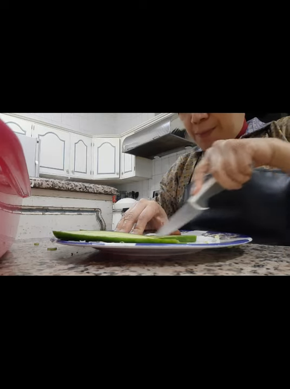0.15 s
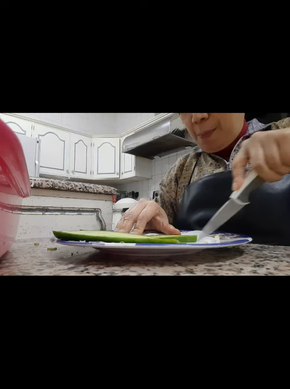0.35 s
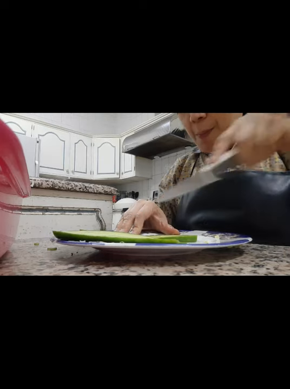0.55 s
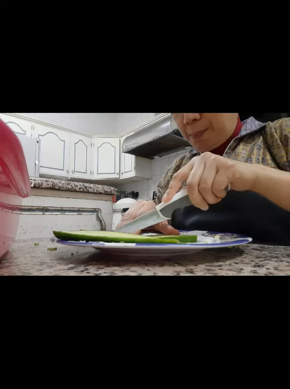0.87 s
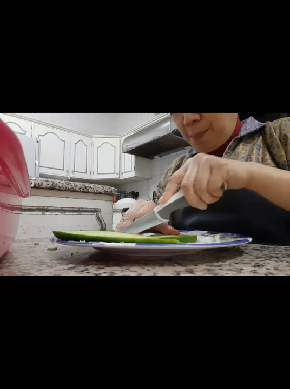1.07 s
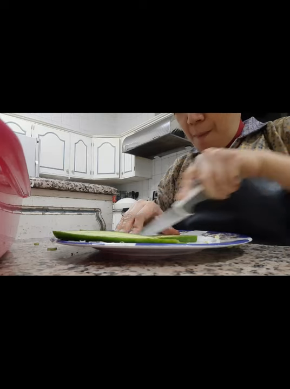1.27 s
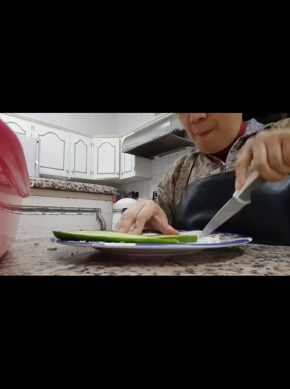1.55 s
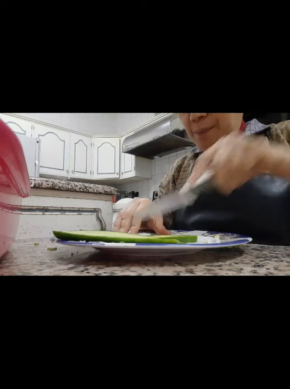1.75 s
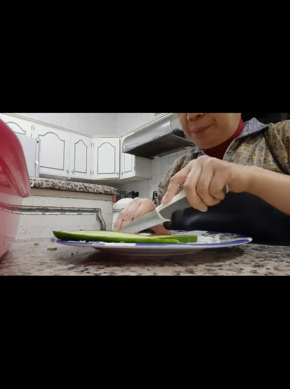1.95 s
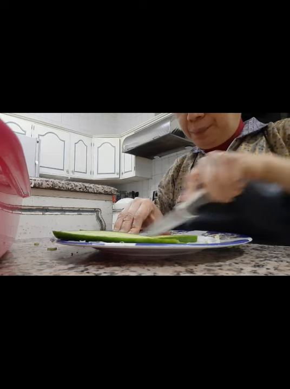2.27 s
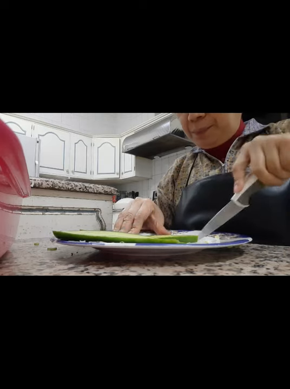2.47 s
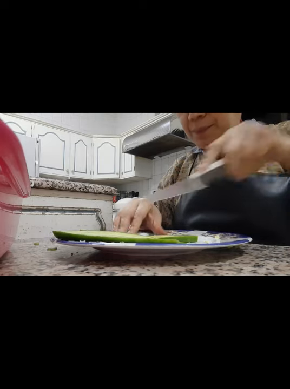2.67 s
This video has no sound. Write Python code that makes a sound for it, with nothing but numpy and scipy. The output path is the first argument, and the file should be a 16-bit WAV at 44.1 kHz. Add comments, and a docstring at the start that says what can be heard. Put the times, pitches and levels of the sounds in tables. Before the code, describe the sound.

Close up, three cucumber slices: rasping crunch, hollow knocks, bright blade click on the plate, then a pause. Light taps set the blade down before the second and third cuts; steady hum in a reverberant kitchen.

```python
"""Knife slicing cucumber.

A knife makes three strokes through a cucumber on a plate, close to a phone in a small tiled kitchen.
Fracture grains make the cut (low crunch, rasp, wet hiss) and a faint bright tick and hiss bursts.
Damped modes plus noise cracks make the skin snaps, plate clicks and the taps before strokes two and three.
Noise-driven hum lines, a sine whine and coloured air noise make the appliance behind.
"""
import sys
import numpy as np
from scipy import signal
from scipy.fft import rfft, irfft
from scipy.io import wavfile

SR = 44100
rng = np.random.default_rng(int(sys.argv[2]) if len(sys.argv) > 2 else 0)


def digitize_waveform(pressure):
    """Quantize a signal to 16-bit integers and store it at the path in sys.argv[1].

    Rows of a 2-D input are taken as channels; values are limited to [-1, 1].
    """
    field = np.atleast_2d(pressure).T
    bounded = np.clip(field, -1, 1)
    quanta = np.round(bounded * 32767).astype(np.int16)
    wavfile.write(sys.argv[1], SR, quanta)


N = 123479


def amp(db):
    """Decibels to gain."""
    return 10 ** (np.asarray(db) / 20)


def unit(x):
    """Scale to rms 1."""
    return x / np.sqrt(np.mean(x ** 2))


def pan(left_minus_right_db):
    """Gains of the left and right ports."""
    return amp(np.array([[left_minus_right_db], [-left_minus_right_db]]) / 2)


def spread(three, apart):
    """Stereo pair from one shared and two separate signals; apart: 0 shared, 1 separate."""
    apart = np.clip(apart, 0, 1)
    return np.sqrt(1 - apart) * three[0] + np.sqrt(apart) * three[1:]


def add(out, start_s, sound):
    """Mix a sound in at a time."""
    i = max(int(start_s * SR), 0)
    out[:, i:i + sound.shape[1]] += sound[:, :N - i]


def colour(x, points):
    """Minimum-phase filter of unit energy through (f/Hz, level/dB), falling 30 dB/octave beyond the ends."""
    hz, db = np.array(points, float).T
    octave = np.log2(np.maximum(np.arange(4097) * SR / 8192, 1))
    below = np.maximum(np.log2(hz[0]) - octave, 0)
    above = np.maximum(octave - np.log2(hz[-1]), 0)
    response_db = np.interp(octave, np.log2(hz), db) - 30 * (below + above)
    # folding the cepstrum makes the response causal
    cepstrum = irfft(np.log(amp(np.maximum(response_db, -100))))
    cepstrum[1:4096] *= 2
    cepstrum[4097:] = 0
    impulse = irfft(np.exp(rfft(cepstrum)))
    impulse = impulse[None] / np.linalg.norm(impulse)
    return signal.fftconvolve(x, impulse, axes=1)[:, :x.shape[1]]


def decay(t, t60_s):
    """Exponential fall of 60 dB in t60."""
    return np.exp(-np.log(1000) * t / t60_s)


PORT_LAG_S, RING_RISE_S = 0.00004, 0.00045


def ring(hz, db, t60_s, rise_s=RING_RISE_S, delay_s=0):
    """One damped mode, reaching the right port slightly later."""
    t = np.maximum(np.arange(SR // 3) / SR - delay_s - np.array([[0], [PORT_LAG_S]]), 0)
    return amp(db) * np.sin(2 * np.pi * hz * t) * decay(t, t60_s) * (1 - np.exp(-t / rise_s))


CRACK_RISE_S = 0.0006


def crack(points, t60_s, apart):
    """Short contact noise that builds as the edge bites, then dies away."""
    t = np.arange(SR // 8) / SR
    env = decay(t, t60_s) * (1 - np.exp(-(t / CRACK_RISE_S) ** 2))
    return colour(spread(rng.standard_normal((3, len(t))), apart) * env, points)


def grains(rate_per_s, scatter_db, apart):
    """Stereo stream of tiny grains: random impulses of either sign and scattered size; rms 1."""
    size = amp(scatter_db * np.clip(rng.standard_normal((3, N)), -2, 2))
    sign = rng.choice([-1, 1], (3, N))
    struck = rng.random((3, N)) < rate_per_s / SR
    return unit(spread(size * sign * struck, apart))


# hum lines before pan: f/Hz, level/dB, full width at half amplitude/Hz
HUM_LINES = [(105, -63.5, 6), (211.2, -49.5, 3.7), (292.4, -44, 6.5), (314.6, -45, 9.9), (462, -56, 4)]
# air rush colour: f/Hz, relative level/dB
AIR_COLOUR = [(36, -37), (52, -21), (78, -32), (100, -21), (150, -20.5), (185, -12), (260, -11), (330, -8),
              (400, -13), (520, -15.5), (700, -18), (1000, -25.5), (1500, -35.5), (2300, -38), (2800, -39),
              (3400, -51), (4500, -55.5), (8000, -53), (10000, -58), (16000, -62.5)]
AIR_DB = -41.5
HUM_STEADINESS = 0.38  # 0 fades freely, 1 holds its level
WHINE_HZ, WHINE_PEAK_DB = 2730, -69.5


def appliance():
    """Wavering narrowband hum and a steady sine whine over an air rush whose bass is alike at both ports."""
    f = np.arange(N // 2 + 1) * SR / N
    hum = amp(WHINE_PEAK_DB) * np.sin(2 * np.pi * WHINE_HZ * np.arange(N) / SR)
    for hz, db, width_hz in HUM_LINES:
        band = 1 + ((f - hz) / (width_hz / 2)) ** 4
        line = irfft(rfft(rng.standard_normal((3, N))) / band, N)
        envelope = np.abs(signal.hilbert(line)) + 1e-12
        line = line / envelope ** HUM_STEADINESS
        hum = hum + amp(db) * unit(spread(line, apart=0.065))
    air_apart = 0.063 + 1.24 / (1 + (650 / (f + 1)) ** 4)
    air = irfft(spread(rfft(rng.standard_normal((3, N))), air_apart), N)
    return (hum + amp(AIR_DB) * colour(air, AIR_COLOUR)) * pan(1.5)


# reverberation bands: f/Hz, t60/s, level/dB
ROOM_BANDS = [(300, 0.13, -0.5), (710, 1, -8.5), (1545, 0.67, -9.5), (2280, 0.67, -5), (4180, 0.53, -8.5),
              (6600, 0.6, -14.5), (8500, 0.51, -9.5), (12500, 0.36, -11.5), (15700, 0.35, -12)]
ROOM_BUILD_S = 0.0097
EARLY_T60_S, EARLY_DB = 0.017, -10.5


def kitchen(x):
    """Quick scatter from worktop and cook, then diffuse reverberation from tiles and cupboards."""
    t = np.arange(SR) / SR
    hz, t60_s, db = np.array(ROOM_BANDS).T
    noise = rfft(rng.standard_normal((2, SR)))
    log_f = np.log(np.arange(SR // 2 + 1) + 1)
    early = t * decay(t, EARLY_T60_S)
    early = early / np.linalg.norm(early)
    tail = amp(EARLY_DB) * spread(rng.standard_normal((3, SR)), apart=0.7) * early
    for k, share in enumerate(np.eye(len(hz))):
        env = decay(t, t60_s[k]) * (1 - np.exp(-(t / ROOM_BUILD_S) ** 2))
        band = irfft(noise * np.interp(log_f, np.log(hz), share), SR)
        tail = tail + band * amp(db[k]) * env / np.linalg.norm(env)
    return signal.fftconvolve(x, tail, axes=1)[:, :N]


# faint bursts: t/s, length/s, envelope peak/dB
BURSTS = [(0.059, 0.0044, -46), (1.06, 0.011, -50.5), (1.078, 0.038, -52)]


def faint_bursts():
    """Brief bright noise, a tick and hiss bursts: grains under half-sine envelopes."""
    t = np.arange(N) / SR
    env = sum(amp(db) * np.sin(np.pi * np.clip((t - start_s) / length_s, 0, 1))
              for start_s, length_s, db in BURSTS)
    noise = env * grains(3290, scatter_db=5, apart=0.9)
    return colour(noise, [(2000, -5.0), (6000, -3.5), (9000, -2), (12000, 5.0), (15500, -6.5)])


# plate mode, strength set by where the blade lands: f/Hz, level/dB, t60/s
RIM_MODE = (2005, -14, 0.022)


def blows(rows, modes, crack_colour, crack_t60_s):
    """Blade contacts as two layers: damped modes, and noise cracks low-passed at each row's top."""
    rings, cracks = np.zeros((2, N)), np.zeros((2, N))
    body = sum(ring(*mode) for mode in modes)
    for start_s, db, crack_db, top_hz, rim_db in rows:
        add(rings, start_s, amp(db) * (body + amp(rim_db) * ring(*RIM_MODE)))
        soften = signal.butter(2, min(top_hz, SR / 2 - 1), fs=SR, output="sos")
        noise = signal.sosfilt(soften, crack(crack_colour, crack_t60_s, apart=0.94))
        add(cracks, start_s - CRACK_RISE_S / 2, amp(crack_db) * noise)
    return rings, cracks


# blade set down: t/s, ring gain/dB, crack gain/dB, crack top f/Hz, rim mode gain/dB
TAPS = [(1.0622, -47, -54, 16000, -12), (1.1072, -29, -28, 12840, 16), (2.1246, -22, -15, 15900, -6)]
# tap modes: f/Hz, level/dB, t60/s
TAP_MODES = [(631, -6, 0.2), (752, -6.5, 0.082), (1736, -2, 0.017), (2440, -6.5, 0.058), (2560, -7, 0.0087),
             (3790, -8, 0.019), (4160, -6.5, 0.011), (5700, -6, 0.011), (6170, -6.5, 0.0085),
             (8830, -15, 0.015)]
# tap crack colour: f/Hz, relative level/dB
TAP_CRACK_COLOUR = [(500, 7), (1300, -1.5), (2400, 7.5), (3400, -17), (5000, -8.5), (6000, -5.5),
                    (9500, -12.5), (12000, -13.5), (15500, -7.5)]


def taps():
    """Blade set down on the cucumber: mode rings and noise cracks."""
    return blows(TAPS, TAP_MODES, TAP_CRACK_COLOUR, crack_t60_s=0.016)


# blade tip on plate: t/s, ring gain/dB, crack gain/dB, crack top f/Hz, rim mode gain/dB
CLICKS = [(.4002, -10.5, -12.5, 11300, -4), (.4545, -28.5, -43, 6000, 17.5),
          (1.5247, -10, -6.5, 12000, -10), (1.5336, -13.5, -10, 14900, 12), (2.5186, -16.5, -19, 7520, -4)]
# click modes: f/Hz, level/dB, t60/s
CLICK_MODES = [(608, -6, 0.018), (1671, -7, 0.021), (2930, -1.5, 0.012), (4480, 1.5, 0.0044),
               (5060, -2.5, 0.005), (6470, -1.5, 0.0037)]
# click crack colour: f/Hz, relative level/dB
CLICK_CRACK_COLOUR = [(400, -8), (1200, -7.5), (2300, 4.5), (3000, -2), (3750, -8.5), (4300, -0.5),
                      (5400, 0.5), (6800, -2), (10000, -10.5), (12800, -6), (15500, -12)]


def clicks():
    """Blade tip dropping onto the plate: mode rings and noise cracks."""
    return blows(CLICKS, CLICK_MODES, CLICK_CRACK_COLOUR, crack_t60_s=0.012)


# skin snaps: t/s, knock gain/dB, lower resonance f/Hz, upper re lower/dB, crack gain/dB
SNAPS = [(.2904, 5, 649, 2, -19), (.3035, -15.5, 610, 9, -44), (.3185, -30, 655, 5, -38),
         (1.375, -2.5, 740, -32, -50), (1.3928, -9, 650, -3.5, -48), (1.3998, -4.5, 618, -8, -29.5),
         (1.4255, -5.5, 666, -10, -49.5), (1.4415, -9, 660, -7.5, -44), (2.378, -4.5, 629, -14, -33),
         (2.392, -11.5, 613, -1.5, -41), (2.4055, -13, 620, 1.5, -43.5), (2.4198, -10.5, 610, -4, -43),
         (2.4295, -19, 700, 6, -47), (2.4472, -15.5, 630, 6, -37), (2.461, -21.5, 660, 6, -44),
         (2.6285, -17.5, 704, -11.5, -52.5)]
# lower cucumber-plate pair: multiple of lower resonance, level/dB, t60/s, rise/s, delay/s
SNAP_LOW_MODES = [(0.999, 5, 0.016, 0.0065, 0), (1.52, -22, 0.043, 0.0087, 0)]
# upper pair: f/Hz, level/dB, t60/s, rise/s, delay/s
SNAP_HIGH_MODES = [(1808, 4, 0.0066, 0.0027, 0.001742), (2131, -12, 0.016, 0.0025, 0.001465)]


def snaps():
    """Skin gives way: a small noise crack and a hollow, quickly damped knock."""
    out = np.zeros((2, N))
    high = sum(ring(*mode) for mode in SNAP_HIGH_MODES)
    for start_s, db, low_hz, upper_db, crack_db in SNAPS:
        low = sum(ring(low_hz * ratio, *shape) for ratio, *shape in SNAP_LOW_MODES)
        add(out, start_s, amp(db) * (low + amp(upper_db) * high))
        add(out, start_s, amp(crack_db) * crack(HISS_COLOUR, t60_s=0.012, apart=0.97))
    return out


MEDIAN_SLIPS_PER_S, SLIP_GAP_LOG_SD, SLIP_DECAY_S = 66, 0.37, 0.0033
SLIP_DB, SLIP_SCATTER_DB = 1.5, 2.5  # surge re steady friction


def judder():
    """Stick-slip of the blade: uneven surges of friction that each die away; rms 1."""
    gaps, sizes = rng.standard_normal(size=(600, 2)).T
    starts_s = np.cumsum(np.exp(SLIP_GAP_LOG_SD * gaps)) / MEDIAN_SLIPS_PER_S
    t = np.arange(N) / SR + starts_s[0]
    slip = np.searchsorted(starts_s, t, side="right") - 1
    surge = amp(SLIP_DB + SLIP_SCATTER_DB * sizes[slip])
    return unit(1 + surge * np.exp(-(t - starts_s[slip]) / SLIP_DECAY_S))


# one list a stroke: t/s, then crunch, rasp, hiss envelope/dB before trims
STROKES = [
    [(0, -44.5, -47, -49.5), (.08, -40, -43.5, -47), (.13, -41, -41, -45), (.21, -36.5, -37, -44.5),
     (.28, -31.5, -34, -39), (.32, -45, -34.5, -41.5), (.36, -72, -67, -50), (.395, -59, -49, -55)],
    [(1.2, -51, -60, -59), (1.25, -55, -51, -56), (1.29, -41.5, -43, -48), (1.35, -32.5, -39, -45),
     (1.4, -30.5, -39.5, -43), (1.45, -37.5, -36.5, -41), (1.49, -43, -43.5, -47), (1.52, -45, -66, -53.5)],
    [(2.135, -51, -50, -47), (2.17, -55, -60, -53), (2.21, -59, -73, -63), (2.245, -50, -56, -46.5),
     (2.27, -48, -49, -53), (2.33, -39.5, -39, -44), (2.385, -29.5, -39.5, -43), (2.445, -51, -36.5, -43),
     (2.475, -79, -56, -49), (2.51, -69, -64, -56)],
]
# colours of crunch, rasp, hiss: f/Hz, relative level/dB
CRUNCH_COLOUR = [(300, -19.5), (450, -12.5), (610, -3), (740, -1), (850, -15.5), (950, -4), (1100, -30),
                 (1300, -36)]
RASP_COLOUR = [(1200, -8), (1450, -7), (1750, -2), (2000, -2.5), (2300, -5.5), (2600, -19), (2900, -16),
               (3300, -39)]
HISS_COLOUR = [(1500, -25), (3300, -1), (4450, 2.5), (6000, -1), (8000, -2), (9800, -8.5), (11400, -2.5),
               (15000, -8)]
CRACKS_PER_S, FIBRES_PER_S, CELLS_PER_S = 450, 1400, 14000
CRACKLES_PER_S, CRACKLE_DB = 130, -14.5  # juicy crackles, re hiss grains
CRUNCH_TRIM_DB, RASP_TRIM_DB, HISS_TRIM_DB = 0.5, 2.14, -2.27


def stroke_envelope(column):
    """Sum over strokes of one level column, interpolated in dB."""
    t = np.arange(N) / SR
    strokes = [np.array(stroke) for stroke in STROKES]
    return sum(amp(np.interp(t, s[:, 0], s[:, column], left=-120, right=-120)) for s in strokes)


def slicing():
    """Cracks thud in the plate, fibres rasp along the blade, bursting cells hiss; judder modulates."""
    slips = judder()
    cracks = unit(np.sqrt(slips)) * grains(CRACKS_PER_S, scatter_db=0, apart=0.033)
    crunch = colour(stroke_envelope(1) * cracks, CRUNCH_COLOUR) * pan(0.5)
    fibres = slips * grains(FIBRES_PER_S, scatter_db=2, apart=0.74)
    rasp = colour(stroke_envelope(2) * fibres, RASP_COLOUR)
    cells = grains(CELLS_PER_S, scatter_db=5.5, apart=1.0)
    crackles = slips * grains(CRACKLES_PER_S, scatter_db=8.5, apart=0.55)
    hiss = colour(stroke_envelope(3) * (cells + amp(CRACKLE_DB) * crackles), HISS_COLOUR)
    return amp(CRUNCH_TRIM_DB) * crunch + amp(RASP_TRIM_DB) * rasp + amp(HISS_TRIM_DB) * hiss


PLATE_GAP_HZ, PLATE_GAP_WIDTH_HZ = 1297, 294
BASS_CUT_HZ = 220


def scene():
    """Knife and plate, mostly left of centre and too small to radiate bass, in the humming kitchen."""
    click_rings, click_cracks = clicks()
    tap_rings, tap_cracks = taps()
    # sound, left minus right/dB, reverberation send/dB
    sounds = [
        (slicing() + faint_bursts(), 2.6, 0),
        (snaps(), 3.7, 0.82),
        (click_rings, 3, -1.5),
        (tap_rings, 0, -0.63),
        (click_cracks + tap_cracks, 1.4, 0.56),
    ]
    near = sum(x * pan(left_db) for x, left_db, _ in sounds)
    sent = sum(x * amp(room_db) for x, _, room_db in sounds)
    knife = near + kitchen(sent) * pan(0.5)
    # plate barely radiates between its two hollow resonances
    gap = signal.iirnotch(PLATE_GAP_HZ, PLATE_GAP_HZ / PLATE_GAP_WIDTH_HZ, fs=SR)
    knife = signal.lfilter(*gap, knife)
    bass_cut = signal.butter(2, BASS_CUT_HZ, "high", fs=SR, output="sos")
    return signal.sosfilt(bass_cut, knife) + appliance()


TOP_HZ = 15500


def record(dry):
    """Phone: soft saturation near full scale, then a steep low-pass."""
    rounded = dry / (1 + dry ** 8) ** (1 / 8)
    top_cut = signal.ellip(10, 0.2, 80, TOP_HZ, fs=SR, output="sos")
    return signal.sosfilt(top_cut, rounded)


dry = scene()
out = record(dry)
digitize_waveform(out)
```